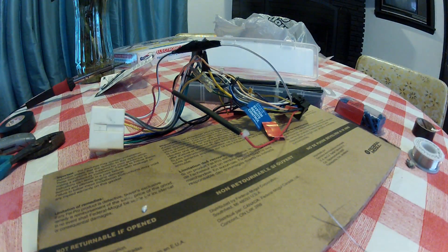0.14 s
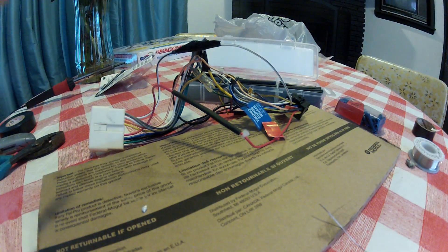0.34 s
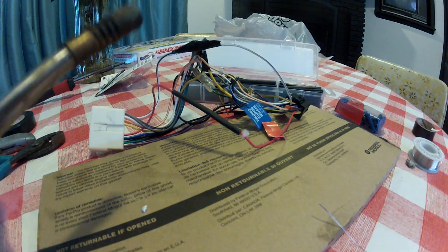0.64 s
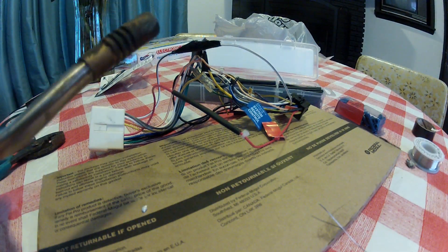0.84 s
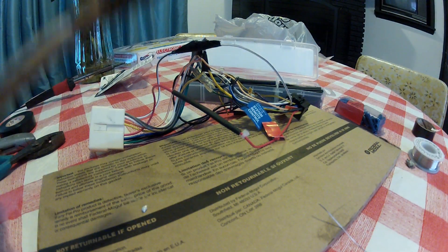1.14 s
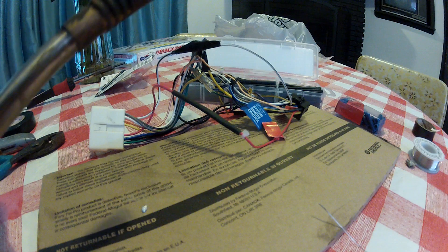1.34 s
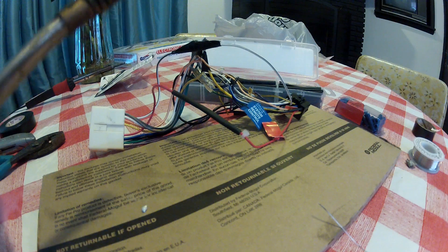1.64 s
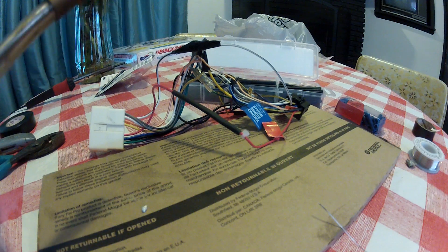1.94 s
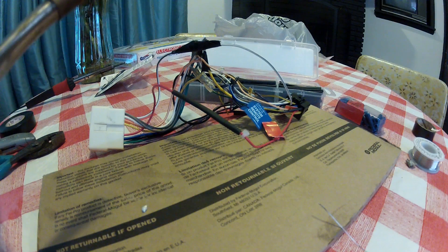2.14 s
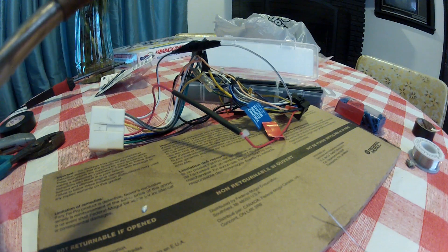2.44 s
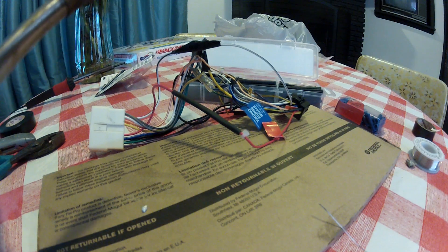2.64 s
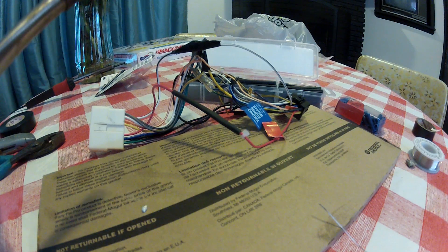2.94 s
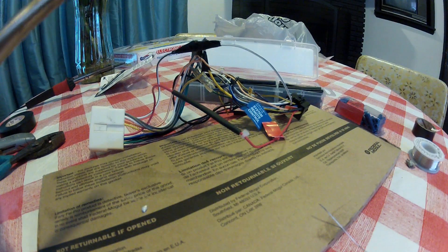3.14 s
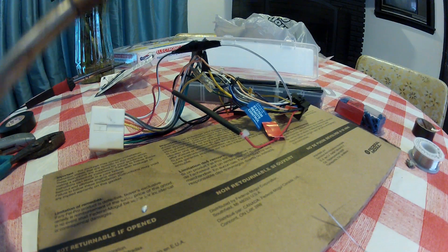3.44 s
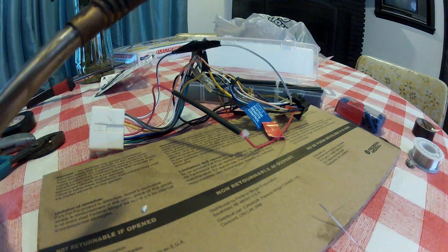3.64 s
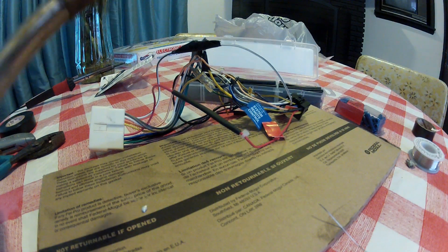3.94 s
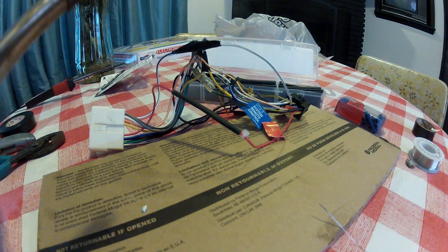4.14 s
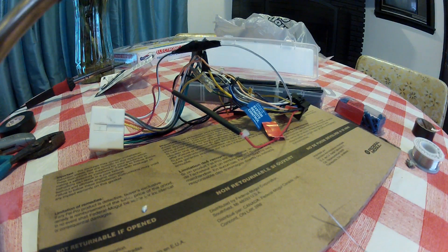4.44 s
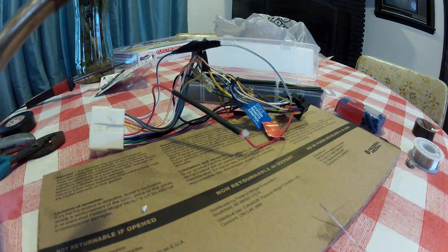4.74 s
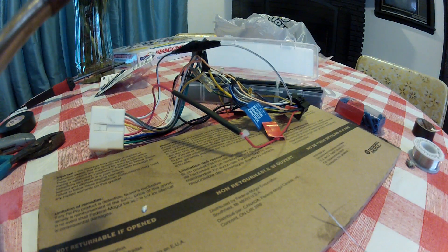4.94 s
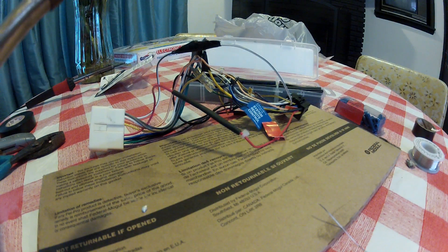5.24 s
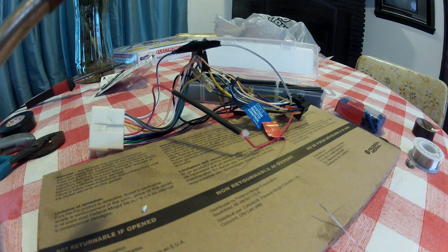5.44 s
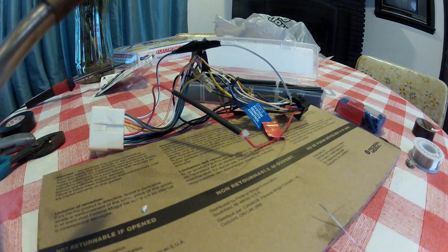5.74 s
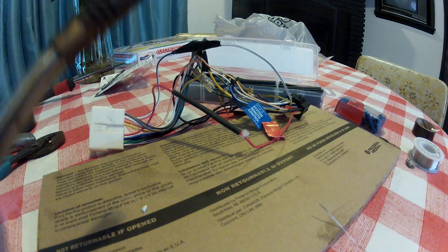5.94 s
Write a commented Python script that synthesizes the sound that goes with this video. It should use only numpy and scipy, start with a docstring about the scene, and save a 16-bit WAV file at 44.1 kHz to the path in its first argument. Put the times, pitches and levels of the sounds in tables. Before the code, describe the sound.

A dull table bump and small metallic clicks, a thin gas hiss, then a sharp ignition pop, a roaring flame turned down, and more clicks.

```python
"""Gas torch lit and turned down

A propane torch is picked up over a table in a small room: damped modes give a dull bump, knocks and clicks.
Gas whistles as noise through the burner tube's resonances and lights with a crack and a pressure pop.
The flame roars as shaped noise that follows the gas flow, and is turned down to a low flutter;
a soft puff swells before it goes out, and the torch clicks a few more times."""
import sys
import numpy as np
from scipy import signal
from scipy.fft import rfft, irfft
from scipy.io import wavfile
from scipy.ndimage import uniform_filter1d

SR = 44100
rng = np.random.default_rng(int(sys.argv[2]) if len(sys.argv) > 2 else 0)


def wrap_up_sound(samples):
    """Save the sound to the file named by the first command line argument, as 16-bit audio."""
    columns = np.atleast_2d(samples).T
    # keep every value between -1 and 1, then stretch to whole-number steps
    tamed = np.clip(columns, -1, 1)
    steps = np.round(tamed * 32767).astype(np.int16)
    wavfile.write(sys.argv[1], SR, steps)


N = 268172
T = np.arange(N) / SR  # time [s]
HALF_SECOND = SR // 2  # length of every struck sound [samples]
IGNITION_S = 3.7502

# Relative spectrum of the burning roar: f/Hz, density/dB
ROAR_SPECTRUM = [(120, -25.5), (230, 2.5), (280, -0.5), (420, 1.5), (530, -1.5), (690, -0.5), (800, -6.5),
                 (900, -13.5), (1040, -33.5), (1400, -38.5), (4000, -69)]
# Relative spectrum of the low flame body and of the table's thud: f/Hz, density/dB
LOW_SPECTRUM = [(30, -20), (55, -8), (84, -4.5), (110, -7), (140, -2), (180, -18.5), (230, -7.5), (310, -4),
                (500, -10.5), (1500, -58)]
# Relative spectrum of a dry contact: f/Hz, density/dB
SNAP_SPECTRUM = [(900, -27), (1500, 2.5), (2200, 0.5), (3500, 1.5), (4200, 0), (6000, -1.5)]


def undb(db):
    """Level to amplitude: 20 dB is a factor of ten."""
    return 10 ** (np.asarray(db) / 20)


def unit(x):
    """Normalization by energy: scale to rms 1."""
    return x / np.sqrt(np.mean(x ** 2))


def crest(x, size=176):
    """Short-time energy: scale so that the loudest 4 ms have rms 1."""
    return x / np.sqrt(uniform_filter1d(x ** 2, size, mode="constant").max())


def curve(rows):
    """Linear interpolation of (t/s, value) rows at every sample."""
    return np.interp(T, *np.transpose(rows))


def ramp(start, length):
    """Linear fade from 0 to 1; both arguments in seconds."""
    return np.clip((T - start) / length, 0, 1)


def walk(rate):
    """Low-passed noise: a smooth random wander with rms 1, cutoff in Hz."""
    lowpass = signal.butter(2, rate, fs=SR, output="sos")
    return unit(signal.sosfilt(lowpass, rng.standard_normal(N)))


def filtered_noise(gain):
    """Spectral shaping: white noise weighted by a gain at each frequency, rms 1."""
    return unit(irfft(rfft(rng.standard_normal(N)) * gain, N))


def noise(points):
    """Noise whose spectrum joins (f/Hz, density/dB) points along log frequency."""
    hz, db = np.transpose(points)
    f = np.maximum(np.fft.rfftfreq(N, 1 / SR), 1)
    return filtered_noise(undb(np.interp(np.log(f), np.log(hz), db)))


def fade(t60):
    """Exponential decay, falling 60 dB in t60 seconds, over half a second."""
    return undb(-60 * T[:HALF_SECOND] / t60)


def ring(modes):
    """Modal superposition: damped sines (f/Hz, t60/s, level/dB), neighbours opposite in sign."""
    response = np.zeros(HALF_SECOND)
    for k, (hz, t60, db) in enumerate(modes):
        mode = undb(db) * fade(t60) * np.sin(2 * np.pi * hz * T[:HALF_SECOND])
        response += (-1) ** k * mode
    return response


def touched(modes, scatter_db=3.5, detune=0.029):
    """Modal excitation: each contact point weights and shifts the modes a little differently."""
    chance = rng.standard_normal((len(modes), 2))
    varied = []
    for (hz, t60, db), (shift, weight) in zip(modes, chance):
        varied.append((hz * (1 + detune * shift), t60, db + scatter_db * weight))
    return ring(varied)


def strike(body, t60, grit):
    """Convolution of a body's response with a force: a blow and a brief rough contact."""
    force = grit * fade(t60) * rng.standard_normal(HALF_SECOND)
    force[0] += 1
    return crest(signal.fftconvolve(force, body)[:HALF_SECOND])


def burst(source, t60):
    """Noise decay: a random half second of a noise, dying away exponentially."""
    excerpt = np.roll(source, rng.integers(N))[:HALF_SECOND]
    return crest(excerpt * fade(t60))


def add(out, s, x):
    """Superposition: mix a sound in at a time in seconds."""
    i = int(s * SR)
    out[i:i + len(x)] += x[:N - i]


def room(x, wet_db, t60=0.19, gap_s=0.008):
    """Diffuse reverberation: direct sound plus the short decaying noise tail of a furnished room."""
    tail = fade(t60) * rng.standard_normal(HALF_SECOND) * (T[:HALF_SECOND] > gap_s)
    tail = tail / np.linalg.norm(tail)
    return x + undb(wet_db) * signal.fftconvolve(x, tail)[:N]


def air(level_db=-63.0, hum_db=-71):
    """Background noise: steady broadband rumble and hiss, with a narrow band heard as a wavering drone."""
    # Relative spectrum of the quiet room: f/Hz, density/dB
    air_spectrum = [(15, -45), (25, -8), (93, 1), (119, -1.5), (225, -2.5), (302, -2.5), (387, -7),
                    (485, -10), (713, -12), (936, -19.5), (2020, -20), (2480, -21), (2840, -21),
                    (5600, -26), (7280, -51), (12300, -120)]
    drone = noise([(65, -35.0), (88, -3), (99, -13.5), (125, -37.0)])
    return noise(air_spectrum) * undb(level_db + 0.096 * walk(2.54)) + undb(hum_db) * drone


def bump(s=.4925, boom_db=-29, thud_db=-38, rustle_db=-62):
    """Impact smoothing: a soft blow booms in the table's low modes, and things on it rustle."""
    # Modes of the bumped table: f/Hz, t60/s, relative level/dB
    table_modes = [(58.7, .25, -32), (86.1, 0.47, -2.5), (145.5, 0.66, -11.5), (175.6, 0.78, -15.5),
                   (228.6, 0.92, -12.5), (294, 0.45, -10), (338, 0.56, -14.5), (397, .3, -17),
                   (665, 0.31, -17.5)]
    out = np.zeros(N)
    push = signal.windows.hann(90)  # a soft contact of two milliseconds
    boom = undb(boom_db) * crest(ring(table_modes))
    boom = boom + undb(thud_db) * burst(noise(LOW_SPECTRUM), t60=0.51)
    add(out, s, np.convolve(boom, push / push.sum()))
    rustle = noise([(400, -24), (750, 0.5), (1100, -12), (2600, -9.5), (4000, -28)])
    add(out, s, undb(rustle_db) * burst(rustle, t60=0.46))
    return out


def fidgets(knock_db=-60, tick_db=-70, centre_hz=480, scatter_db=1.5, gap_s=.1):
    """Jittered timing: faint touches at uneven intervals, as (t/s, knock/dB, tick/dB, f/Hz) rows."""
    # Spells in which the fingers shift faintly: start t/s, end t/s
    spells = [(1.22, 1.55), (2.92, 3.03), (5.22, 5.45)]
    times = np.concatenate([np.arange(start, end, gap_s) for start, end in spells])
    rows = []
    for s, (a, b, c, d) in zip(times, rng.standard_normal((len(times), 4))):
        knock, tick = knock_db + scatter_db * b, tick_db + scatter_db * c
        rows.append((s + gap_s * a / 4, knock, tick, centre_hz * np.exp(0.15 * d)))
    return rows


def handling(knock_db=1, tick_db=-2, snap_db=-3, lift_db=-41, focus_db=12):
    """Modal impact: touches snap, knock the hollow body and tick the metal fittings; the first also thuds."""
    # Touches of the hand: t/s, knock level before trim/dB, tick level before trim/dB,
    # f/Hz of the part of the body that rings most
    touches = [(.978, -41.5, -47.5, 630), (.982, -45.5, -46, 695), (1.245, -54, -69, 503),
               (1.404, -59.5, -75, 400), (1.583, -57, -78, 700), (1.803, -58, -64, 400),
               (1.863, -64, -59.5, 550), (1.904, -44.5, -48, 454), (2.202, -75, -65, 550),
               (2.318, -63, -64, 550), (2.367, -51.5, -62.5, 420), (2.592, -49, -66, 610),
               (2.797, -54, -56, 510), (4.99, -48.5, -52.5, 420), (5.005, -50.5, -53.5, 555),
               (5.281, -77, -58.5, 552), (5.42, -64, -62, 601), (5.457, -58.5, -58.5, 403),
               (5.621, -59, -61.5, 500)]
    # Modes of the hollow torch body: f/Hz, t60/s, relative level before focus and scatter/dB
    body_modes = [(388, 0.051, 2.5), (467, 0.031, -1.5), (599, 0.033, -1.5), (722, 0.038, 0.5)]
    # Modes of the metal fittings before detuning and scatter: f/Hz, t60/s, relative level/dB
    fitting_modes = [(1200, 0.0088, -11.5), (1550, 0.017, -8.5), (1920, 0.013, 0.5), (2240, 0.018, 4),
                     (2356, 0.013, -5), (2746, 0.022, -3), (3260, 0.0086, -5.5), (3970, 0.016, 0),
                     (5130, 0.0099, -2)]
    out, snap = np.zeros(N), noise(SNAP_SPECTRUM)
    for s, knock, tick, centre in touches + fidgets():
        # modes are weaker by focus_db per octave from the centre
        body = [(hz, t60, db - focus_db * abs(np.log2(hz / centre))) for hz, t60, db in body_modes]
        add(out, s, undb(knock + knock_db) * strike(touched(body, scatter_db=2.0), t60=0.018, grit=0.13))
        add(out, s, undb(tick + tick_db) * strike(touched(fitting_modes), t60=0.024, grit=0.56))
        add(out, s, undb(tick + snap_db) * burst(snap, t60=0.053))
    thud = crest(ring([(125.5, 0.045, 0), (247, 0.044, 0)]))
    add(out, touches[0][0], undb(lift_db) * thud)
    return room(out, wet_db=-12.0, t60=0.22)


def gas(waver_db=1.5):
    """Flow-excited resonance: unlit gas whistles in the tube, wavering, until the flame takes over."""
    # Resonances of the burner tube full of cold gas: f/Hz, width/Hz, peak level/dB
    whistle_modes = [(2565, 100, 3), (3877, 170, -2.5), (4730, 77, -5.5), (5290, 200, -9)]
    open_s, open_rise_s = 3.09, 0.16  # the valve opens
    gas_db, build_db_per_s = -68, 1.5  # level at opening, then cold gas builds up
    f = np.fft.rfftfreq(N, 1 / SR)
    tube = np.zeros(len(f))
    for hz, width, db in whistle_modes:
        tube += undb(db) / (1 + ((f - hz) / (width / 2)) ** 2) ** 0.66
    whistle = filtered_noise(tube) * undb(gas_db + waver_db * walk(14))
    build_up = undb(build_db_per_s * (T - open_s))
    return whistle * build_up * ramp(open_s, open_rise_s) * (T < IGNITION_S)


def ignition(crack_db=-20.5, snap_db=-30, pop_db=-12.0, skew=0.36, echo_db=-7, burst_db=-24, boom_db=-24.5):
    """Monopole radiation: the front cracks down the tube, then gas swings out and back in one low pop."""
    # Modes of the burner tube struck by the ignition: f/Hz, t60/s, relative level/dB
    tube_modes = [(1496, 0.01, -11.5), (1830, 0.036, -12), (2070, 0.0098, -2), (2300, 0.031, -19),
                  (2460, 0.059, -10), (2710, 0.006, 1), (2896, 0.033, -25), (3880, 0.016, -8),
                  (4160, .04, -16.5), (4170, 0.01, -4), (4940, 0.014, -36)]
    echo_s = .00375
    pop_s, swing_s = 3.7566, .0031
    crack = undb(crack_db) * strike(ring(tube_modes), t60=0.01, grit=0.093)
    crack = crack + undb(snap_db) * burst(noise(SNAP_SPECTRUM), t60=0.11)
    out = np.zeros(N)
    add(out, IGNITION_S, crack)
    add(out, IGNITION_S + echo_s, undb(echo_db) * crack)  # off the table top
    # warped time: the front is steeper than the back
    u = np.log(np.maximum(1 + skew * (T - pop_s) / swing_s, 1e-3)) / skew
    flow = np.sin(np.pi * u) * np.exp(-(u / 1.25) ** 4)
    pop = np.gradient(flow)  # pressure follows the change of flow
    pop = undb(pop_db) * pop / pop.max()
    add(pop, IGNITION_S + echo_s, undb(burst_db) * burst(noise(ROAR_SPECTRUM), t60=0.044))
    table_boom = crest(ring([(101, 0.12, 0)]))  # the table top gives under the pulse
    add(pop, pop_s - swing_s, undb(boom_db) * table_boom)
    return room(out, wet_db=-10.0, t60=0.17) + room(pop, wet_db=-19.0)


def puff(start_s=4.87, rise_s=.035, t60=.8, level_db=-48.5):
    """Attack and decay: the starved flame gives one soft low swell of noise just before it goes out."""
    dying = undb(-60 * np.maximum(T - start_s, 0) / t60)
    breath = noise([(40, -22), (82, -4), (140, -8), (250, -11), (700, -54)])
    return undb(level_db) * breath * ramp(start_s, rise_s) * dying


def flame(flicker_db=1.1, sputter_db=2.0):
    """Turbulent combustion noise: with falling flow the jet fades fastest, then the roar; the body deepens."""
    # Gas flow while burning, turned down by hand: t/s, level re full flow/dB
    flow_rows = [(3.8, -1.5), (4.02, -0.5), (4.3, -3), (4.37, -6.5), (4.43, -6), (4.53, -14), (4.72, -26),
                 (4.99, -30)]
    # Relative spectrum of the jet: f/Hz, density/dB
    jet_spectrum = [(700, -18), (1050, -9.5), (1220, 1.5), (1550, 2.5), (1750, -5.5), (2020, 6),
                    (2250, -2.5), (2600, 1), (3000, -4.5), (3500, 0), (3850, -5), (4100, -1), (4400, -9),
                    (4800, -4), (5400, -15.5)]
    # Relative spectrum of the flame body before closing: f/Hz, density/dB
    full_spectrum = [(30, -32), (60, -19), (85, -10), (122, -5.5), (142, 2), (178, -5.5), (228, 0),
                     (280, 0), (400, -23.5), (1500, -70)]
    # level at full flow [dB], and the change per dB of flow [dB/dB]
    roar_db, roar_law = -33, 1.08
    jet_db, jet_law = -46, 1.44
    flutter_db, flutter_law = -39, 0.57
    shut_s = 4.99
    flow, eddies = curve(flow_rows), flicker_db * walk(31)
    roar = noise(ROAR_SPECTRUM) * undb(roar_db + roar_law * flow + eddies + sputter_db * walk(85))
    jet = noise(jet_spectrum) * undb(jet_db + jet_law * flow + .5 * eddies + 1.55 * walk(300))
    closing = ramp(4.53, 0.55)
    # equal-power crossfade to the low spectrum
    body = np.sqrt(1 - closing) * noise(full_spectrum) + np.sqrt(closing) * noise(LOW_SPECTRUM)
    flutter = body * undb(flutter_db + flutter_law * flow + eddies)
    burning = ramp(IGNITION_S, 0.005) * (1 - ramp(shut_s, 0.088))
    roar_in_room = room(roar * burning, wet_db=-11.5, t60=0.28)
    jet_in_room = room(jet * burning, wet_db=-6, t60=0.25)
    return roar_in_room + jet_in_room + flutter * burning


def scene():
    """Linear superposition of all sources at one microphone on the table."""
    return (air() + bump() + handling() + gas() + ignition() + puff() + flame())[None]


def record(dry):
    """Sample-and-hold imaging: slow samples, each held, mirror the whole sound into the treble."""
    hold_hz, top_hz = 12000, 15000  # hold rate, upper band limit
    slow = signal.resample_poly(dry, hold_hz, SR, axis=1)
    slow = signal.sosfilt(signal.butter(1, 5750, fs=hold_hz, output="sos"), slow)
    held = np.repeat(slow, 4, axis=1)
    held = signal.resample_poly(held, SR, 4 * hold_hz, axis=1)[:, :N]
    return signal.sosfilt(signal.ellip(10, .2, 70, top_hz, fs=SR, output="sos"), held)


dry = scene()
out = record(dry)
wrap_up_sound(out)
```